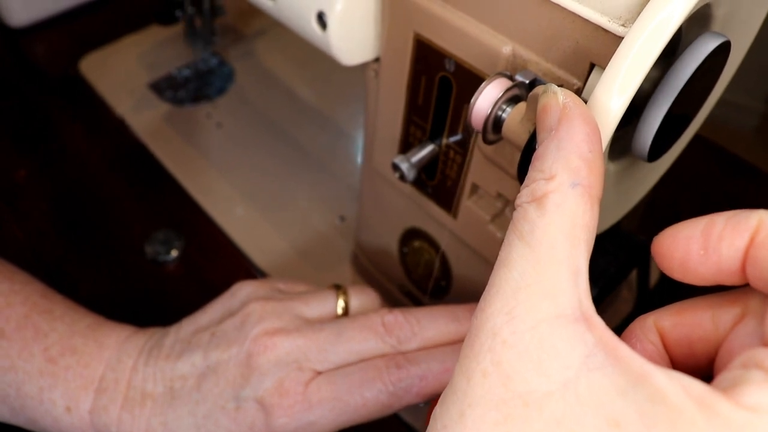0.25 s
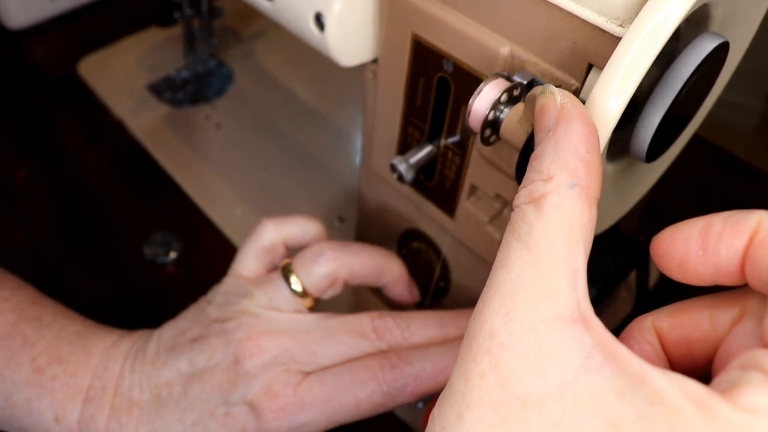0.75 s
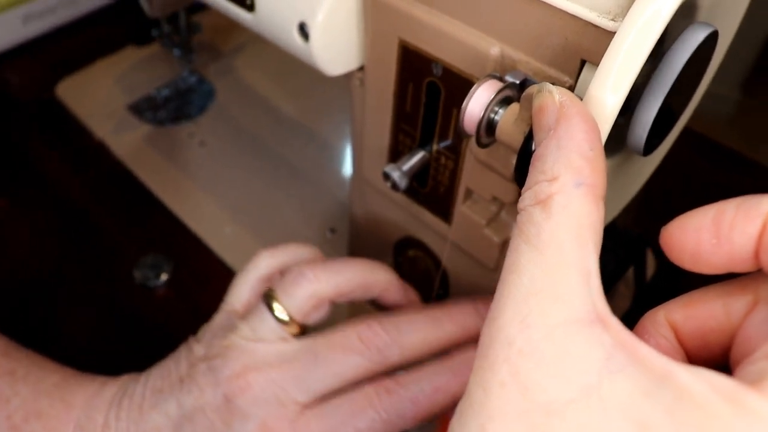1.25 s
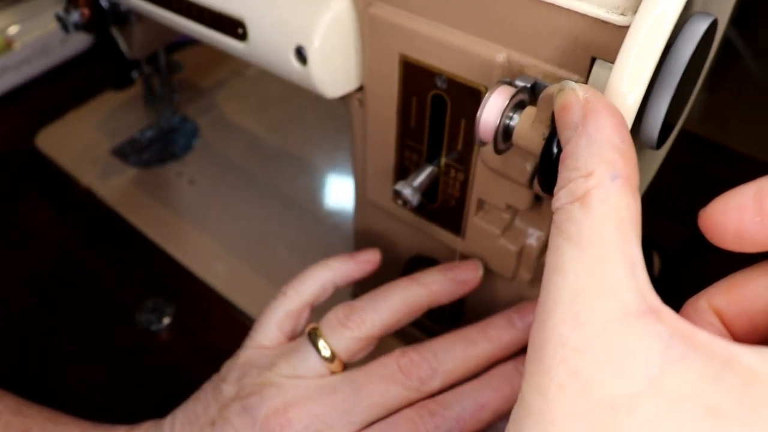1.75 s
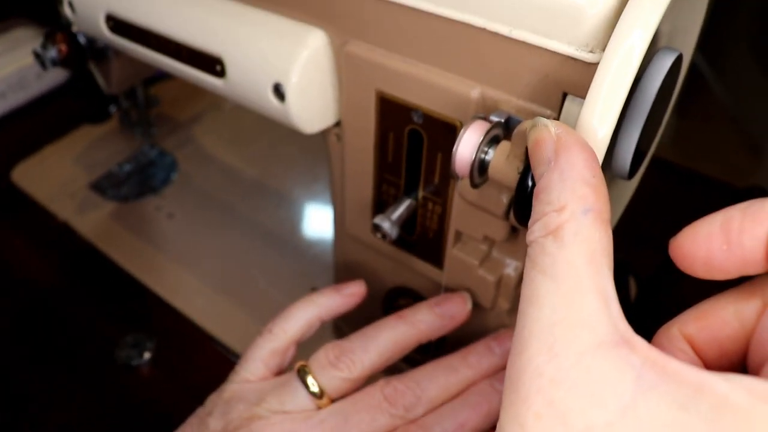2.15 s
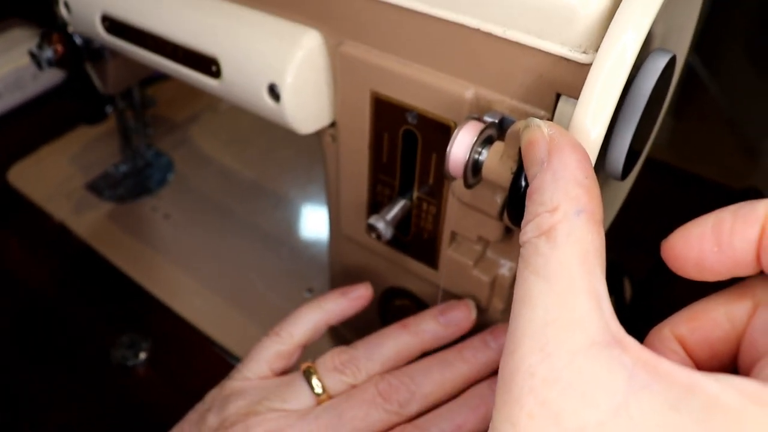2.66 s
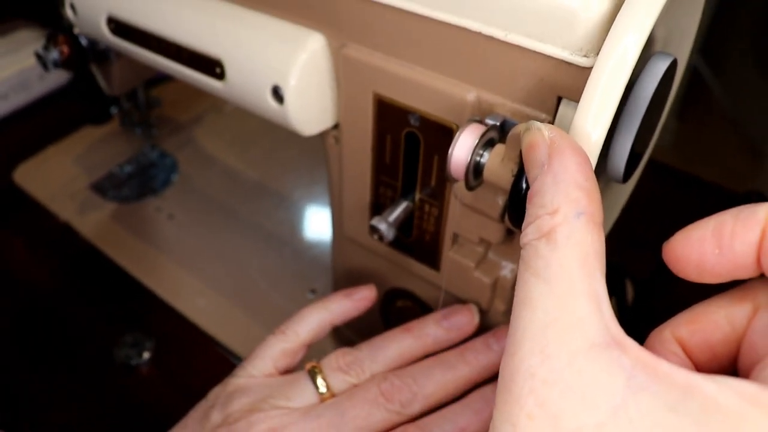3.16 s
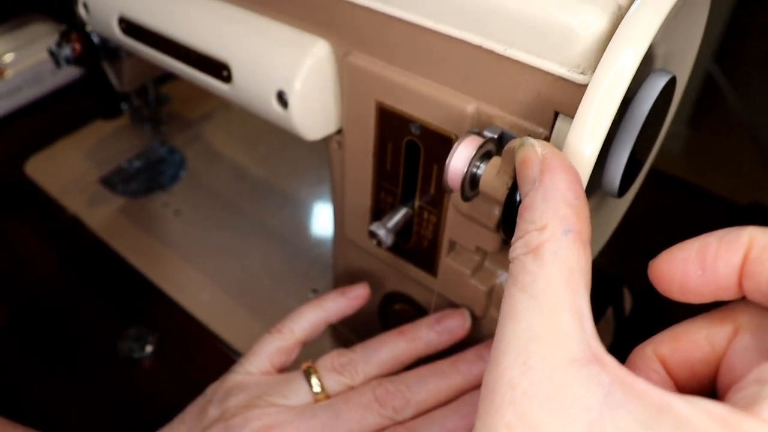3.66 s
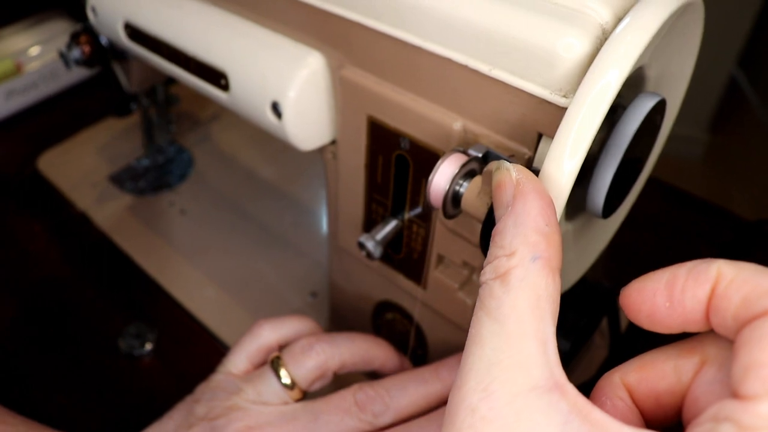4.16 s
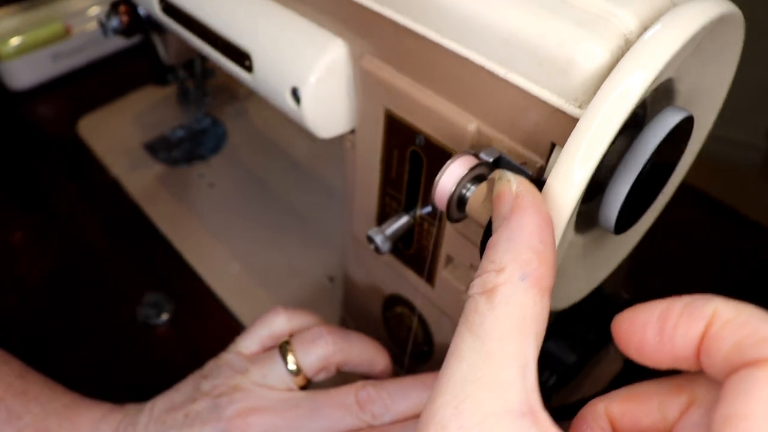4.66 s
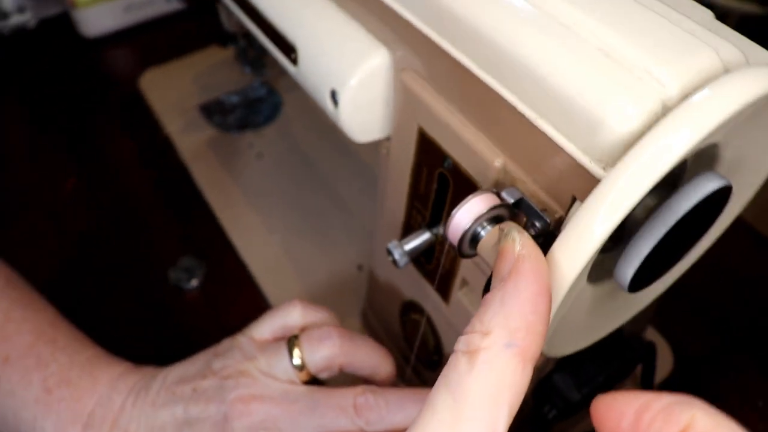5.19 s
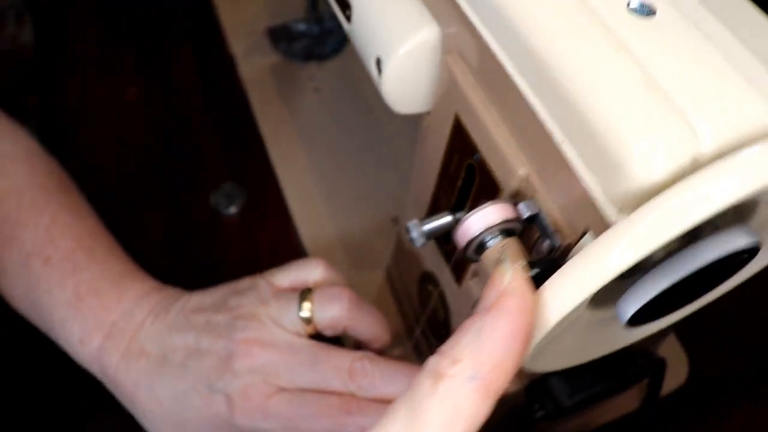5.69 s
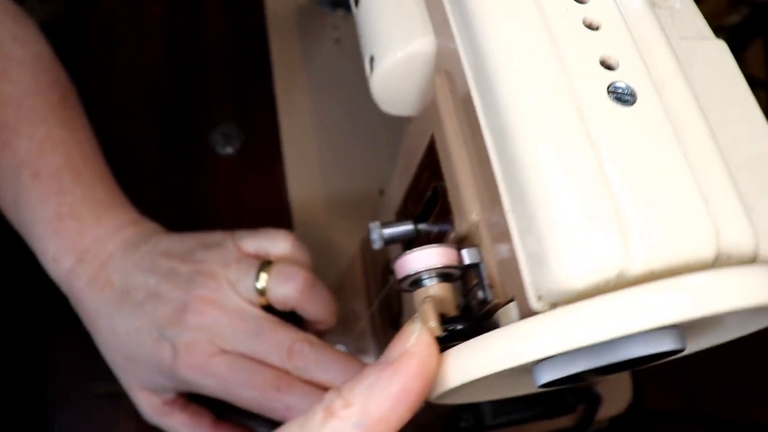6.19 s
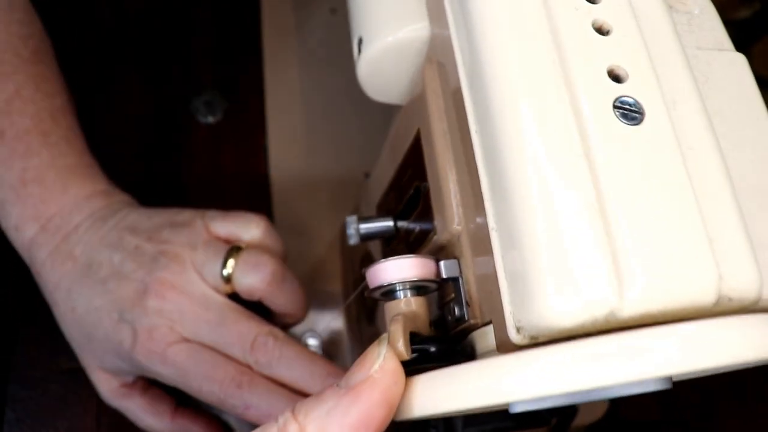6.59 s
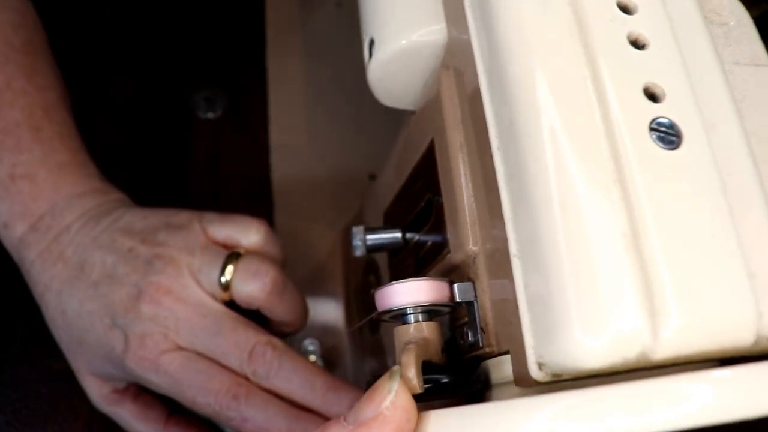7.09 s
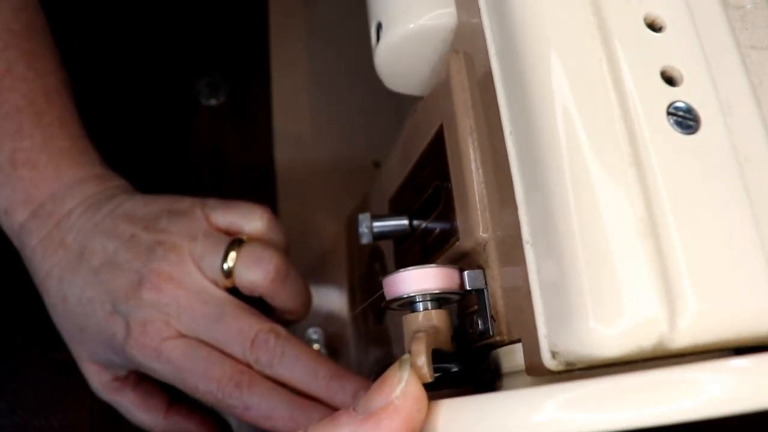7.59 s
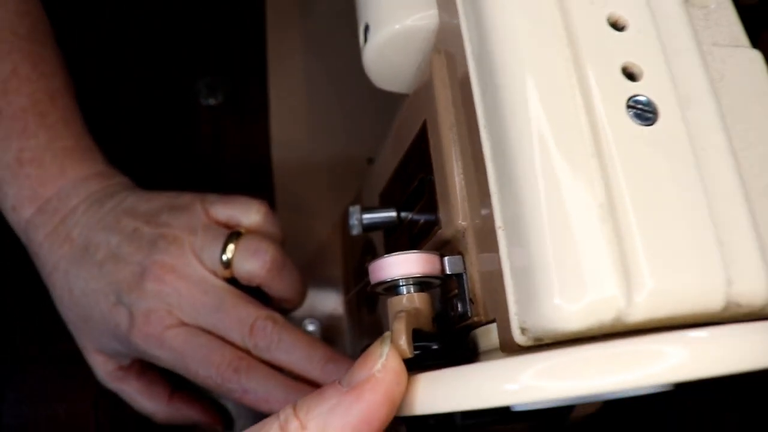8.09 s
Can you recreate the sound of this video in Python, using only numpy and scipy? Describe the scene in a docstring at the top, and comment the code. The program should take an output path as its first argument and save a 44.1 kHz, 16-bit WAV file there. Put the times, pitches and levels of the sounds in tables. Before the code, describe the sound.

A sewing machine motor runs at nearly constant speed throughout, winding a bobbin. A low hum sits under a nasal whine and a bright, dense hiss of brushes and belt. After the first second, tiny crisp metallic ticks come in irregular clusters, then thin out. Close hand-held stereo microphone, dry indoors; the tone colour shifts as it swings from front to above.

```python
"""Sewing machine motor winding a bobbin

A motor runs steadily, heard by a hand-held stereo camera that swings from the front to above.
Sines on multiples of the motor turn, with side tones, sound in the hiss of brushes and belt.
The hiss is shaped noise coloured by the machine's shell; narrow noise bands are humming plates.
The bobbin ticks in bursts of short damped rings, and a limiter ducks the sound after strong peaks."""
import sys
import numpy as np
from scipy import signal
from scipy.io import wavfile
from scipy.ndimage import uniform_filter1d

SR = 44100
rng = np.random.default_rng(int(sys.argv[2]) if len(sys.argv) > 2 else 0)


def digitize_waveform(pressure):
    """Quantize a signal to 16-bit integers and store it at the path in sys.argv[1].

    Rows of a 2-D input are taken as channels; values are limited to [-1, 1].
    """
    field = np.atleast_2d(pressure).T
    bounded = np.clip(field, -1, 1)
    quanta = np.round(bounded * 32767).astype(np.int16)
    wavfile.write(sys.argv[1], SR, quanta)


N = 367794

# Motor speed: time_s, turns_per_s
MOTOR_SPEED = [(0, 129.0), (0.35, 129.05), (0.56, 128.6), (0.63, 128.05), (0.78, 128.2), (1.0, 128.0),
               (1.07, 127.1), (1.45, 127.55), (1.8, 128.25), (2.2, 128.0), (2.57, 127.7), (2.9, 128.9),
               (3.15, 128.95), (3.45, 128.45), (3.9, 128.15), (4.3, 127.6), (4.47, 127.95), (4.73, 127.6),
               (5.0, 127.95), (5.6, 128.05), (6.0, 128.35), (6.2, 128.5), (6.75, 127.95), (7.85, 128.4),
               (8.12, 128.0), (8.34, 128.2)]
# Slow drift of the gain on all but the ticks: time_s, gain_db
MOTOR_DRIFT = [(0, 2), (0.8, 2), (1.1, 1.5), (1.7, 3.5), (2.1, 2.5), (2.6, 3), (3.2, 1.5), (3.9, 1.5),
               (4.25, 3), (4.6, 2), (5.3, 2), (6.0, 1.3), (7.0, 2.5), (8.34, 2.2)]
# Direction of view: time_s, view (0 front, 1 swinging, 2 above)
CAMERA_VIEW = [(0, 0.043), (4.3, 0.041), (5.0, 0.23), (5.5, 0.85), (5.9, 0.88), (6.4, 1.36), (6.7, 1.55),
               (7.0, 2.6), (8.34, 2.04)]
# Rotor and commutator tones, before drift: multiple_of_turn,
# then for each of the three views: left_db, right_db, left_lead_rad
MOTOR_TONES = [(1.0, -64.0, -64.5, -0.1, -62.0, -62.0, 0.0, -62.0, -62.5, -0.1),
               (2.0, -45.0, -45.0, 0.0, -43.0, -43.0, 0.0, -43.5, -43.5, 0.0),
               (3.0, -54.5, -55.5, -0.3, -54.0, -54.0, -0.1, -54.0, -54.0, 0.0),
               (4.0, -58.0, -58.5, -0.2, -62.5, -63.5, -0.8, -62.5, -65.5, -1.3),
               (10.0, -45.0, -45.5, -0.1, -43.5, -46.0, -1.0, -44.5, -43.5, -0.6),
               (11.0, -50.0, -53.5, 2.6, -47.5, -47.5, 5.8, -45.0, -43.5, 5.9),
               (12.0, -60.5, -56.0, 0.7, -56.5, -54.5, -0.3, -54.5, -55.5, -0.3),
               (19.0, -65.5, -55.5, -2.1, -60.0, -52.5, -2.1, -66.5, -54.5, -2.1),
               (20.0, -66.0, -56.0, -2.6, -60.5, -55.0, 0.4, -63.5, -56.0, -1.0),
               (21.0, -55.5, -60.0, 0.3, -60.5, -59.5, 0.9, -56.5, -50.0, 0.8),
               (22.0, -54.0, -45.5, -0.0, -53.0, -50.0, -0.4, -51.0, -52.5, -0.7),
               (23.0, -52.5, -49.0, 1.2, -52.0, -52.5, -0.3, -55.5, -52.0, -0.1),
               (24.0, -58.0, -55.0, 2.2, -57.0, -65.5, 2.2, -66.5, -65.0, 3.8),
               (31.0, -60.0, -58.5, 0.4, -57.0, -58.5, -2.3, -58.0, -53.5, -1.9),
               (32.0, -49.0, -50.0, 0.2, -55.5, -56.5, -1.3, -56.0, -65.0, -2.8),
               (33.0, -46.5, -47.0, -0.5, -55.5, -53.5, -1.2, -57.5, -47.0, 0.8),
               (34.0, -46.5, -48.5, 0.5, -45.0, -51.0, 0.0, -44.5, -52.0, -0.9),
               (35.0, -64.0, -63.0, -2.1, -58.5, -52.5, -0.6, -61.0, -52.5, -1.1),
               (36.0, -57.0, -54.0, 1.9, -52.5, -59.5, 0.5, -51.0, -62.0, -1.6),
               (43.0, -53.0, -53.5, 1.5, -49.0, -47.0, 0.2, -51.0, -52.5, 0.9),
               (44.0, -48.5, -49.0, 2.7, -44.0, -42.0, 5.2, -46.0, -47.0, 5.6),
               (45.0, -53.5, -57.0, 3.0, -63.0, -49.5, 1.5, -51.0, -61.0, -0.2),
               (48.0, -51.0, -53.5, -0.2, -47.0, -49.0, -1.1, -47.5, -62.5, -2.0),
               (50.0, -59.0, -60.0, -1.6, -56.5, -60.5, -3.9, -53.0, -53.5, -3.7),
               (53.0, -59.0, -57.0, -2.3, -55.5, -58.5, 0.3, -58.0, -59.5, 1.5),
               (54.0, -53.0, -49.5, 1.4, -50.0, -55.0, -1.4, -61.0, -53.5, -4.0),
               (55.0, -46.5, -50.0, -2.0, -47.0, -49.5, -0.2, -44.5, -55.5, 1.0),
               (56.0, -56.0, -57.0, 2.5, -55.5, -50.5, 4.7, -53.5, -49.0, 2.0),
               (57.0, -54.0, -62.5, 0.7, -61.5, -53.5, 3.5, -55.0, -53.5, 1.4),
               (65.0, -49.0, -51.0, -1.4, -52.5, -51.0, -3.4, -55.0, -49.0, -1.4),
               (66.0, -51.5, -53.0, -1.6, -54.5, -58.5, -2.5, -58.0, -64.5, -0.7),
               (67.0, -56.5, -56.5, 0.1, -53.5, -55.5, 2.9, -54.0, -53.5, 3.3),
               (76.0, -56.5, -54.0, -0.3, -54.0, -51.0, -2.6, -64.5, -55.5, -2.7),
               (77.0, -60.0, -53.0, 1.7, -57.5, -55.5, 0.3, -62.5, -58.0, 2.8),
               (87.0, -58.0, -65.5, -1.9, -63.0, -56.5, 1.2, -53.5, -55.0, 2.8),
               (88.0, -64.0, -60.5, -1.7, -61.5, -59.0, -3.9, -53.0, -54.5, -2.0)]
# Side tones: multiple_of_turn, beat_steps (turn less mains ripple), tyre_steps (winder tyre's turn),
# front_db, above_db (both relative to the tone)
SIDE_TONES = [(1, -1, 0, -16, -16), (2, -2, 0, -25, -25), (2, -1, 0, -13, -12), (2, 1, 0, -16, -15),
              (2, 0, 1, -21, -23), (3, -1, 0, -13, -14), (3, 1, 0, -14, -14), (3, 0, 1, -12, -13),
              (4, -1, 0, -7, -8), (10, -1, 0, -20, -18), (10, 1, 0, -22, -19), (10, 0, -1, -8, -10),
              (10, 0, 1, -22, -11), (10, 0, 2, -10, -14), (10, 0, 3, -16, -21), (11, -1, 0, -15, -14),
              (11, 1, 0, -15, -14), (11, 0, -1, -7, -19), (11, 0, 1, -5, -16), (11, 0, 2, -11, -24),
              (21, 0, 2, -3, -8)]
# Slow gain of two groups of tones, near 1.3 and 4.2 kHz: time_s, whine_db, whir_db
WHINE_AND_WHIR = [(0, -3, -1), (0.3, 2, -1), (0.5, 0.5, 0), (0.65, 1, 2.5), (0.85, 0, 0.5), (1.08, 3.5, 2),
                  (1.25, 1, 0), (1.7, 0, 1), (2.15, 0, -2), (2.3, 2.5, -1.5), (2.6, 1, 0),
                  (2.9, -0.5, -0.5), (3.3, -1, -1.5), (3.55, 1.5, -1), (3.75, -0.5, -5), (4.0, 1, 2.5),
                  (4.2, 2, 1), (4.5, 0.5, -1.1), (4.7, 1.5, -3), (5.0, 0.5, 0), (5.4, 0.5, 0),
                  (5.7, -1.5, -2), (6.1, 1, 0.5), (6.6, 1.7, -1), (7.3, 0.7, -0.5), (7.8, 1.1, 1.5),
                  (8.34, .1, -2)]
# Passing of the ring near 5.6 kHz between two multiples as the camera swings:
# time_s, multiple_43_db, multiple_44_db
RING_HANDOVER = [(4.6, 0, 1), (5.3, 3.5, -3), (5.8, -1, -1), (6.2, 0, 3), (6.8, 0, 4), (7.2, 1, 1.5),
                 (8.34, 1, 2)]
# Brush and belt noise density before colouring: frequency_hz, level_db_per_hz
HISS_SPECTRUM = [(40, -103), (80, -93.5), (190, -81), (280, -73), (350, -76.5), (480, -78.5), (620, -78),
                 (850, -80), (1100, -74.5), (1600, -72), (3800, -69.5), (7800, -67.5), (10300, -69),
                 (12300, -73.5), (14500, -77.5), (15800, -81.5)]
# Shell resonances: frequency_hz, width_hz, then for each view: left_db, right_db
SHELL_RESONANCES = [(1180, 120, -0.5, -0.5, 5, 1, 3, -1), (1520, 55, 3, 0, 6, -8, 2, -1),
                    (2160, 120, -7, 2, -1, -4, -2, 2), (1322, 185, 4.5, 6.5, 0, 4, 5, 7),
                    (1800, 300, -1.5, 0.5, -4, 1.5, -1.5, 0.5), (2280, 230, 4, 5.5, -1, 3.5, -1, 1.5),
                    (2645, 260, 0, 6.5, -1.5, 8, 1.5, 8.5), (3320, 600, 4.5, 3.5, 3.5, 1.5, 2, 2),
                    (4000, 82, 0, -11, -3, 5, 1, 1), (4650, 190, -4, -4, -3, 3.5, -4, 4),
                    (4000, 200, -1, 2.5, -1, 1, 2, -5), (4380, 340, 4.5, 3, 2, 5, 4, 2.5),
                    (4777, 193, 0, 9, 3.5, 1, 6, 6.5), (5020, 230, 2.5, 3.5, 5, 2, 5, 1),
                    (5550, 230, 2, 1.5, 2, 8.5, 2, 0), (6146, 426, 9.5, 5.5, 10, 7.5, 8.5, 2),
                    (6530, 150, 2, 6, 6.5, -8, 0, 5), (7240, 490, 2, 4.5, -2, 9, 5, 7),
                    (7735, 390, 3.5, 6, 3, 2, 4, -1.5), (7900, 200, 8.5, 0.5, 8.5, -8, 7, 1),
                    (8400, 200, 1, -3, -6, 6, -2, 2), (8800, 250, -3, -2.5, -8, 4, -10, 5),
                    (9060, 490, 1, 9, 3.5, 3.5, 4.5, 2), (9940, 400, 1.5, 0.5, 0, 3, 2, 4.5),
                    (10920, 360, -3, 3.5, 1, 1.5, -3, 4.5), (11360, 250, 3, 0.5, 0, 3, 9, 5.5),
                    (12020, 400, -1, 2, 4, 0.5, 3.5, 5), (12200, 300, 1.5, 0, 0, 5, -1, 1),
                    (12700, 250, 0, -6, -1, 0, 0, -2), (13450, 400, -8, -1, -1, -2, 4, 0),
                    (13800, 200, -4, -4, -2, 1, -7, -6), (14500, 550, 1, -11, -1, 3, -6, 1)]
# Left-right likeness of the hiss: frequency_hz, then for each view: share (0-1), left_lead_rad
STEREO_LIKENESS = [(60, 0.9, 0, 0.9, 0, 0.9, 0), (130, 0.95, 0, 0.95, 0, 0.95, 0), (180, 1, 0, 1, 0, 1, 0),
                   (270, 1, 0, 1, 0, 1, 0), (350, 0.84, 0, 0.92, 0, 0.97, 0),
                   (640, 0.86, 0, 0.86, 0, 0.84, 0), (1300, 0.6, -0.2, 0.6, -0.2, 0.6, -0.2),
                   (1800.0, 0.23, -0.3, 0.44, -0.0, 0.37, -0.2),
                   (2100.0, 0.34, -0.3, 0.38, -0.7, 0.58, -0.3),
                   (2400.0, 0.3, -0.4, 0.29, -0.9, 0.32, -0.6), (2700.0, 0.28, 0.2, 0.35, 0.5, 0.41, 0.8),
                   (3000.0, 0.45, 1.1, 0.34, 0.2, 0.49, 0.2), (3300.0, 0.46, 0.1, 0.34, -0.2, 0.29, 0.3),
                   (3600.0, 0.51, -0.3, 0.4, -0.2, 0.57, 0.0), (3900.0, 0.31, -0.1, 0.28, -1.2, 0.13, -1.7),
                   (4200.0, 0.61, -0.1, 0.39, -1.0, 0.1, -5.3), (4500.0, 0.1, 0.6, 0.17, -0.4, 0.24, -8.7),
                   (4800.0, 0.15, 1.6, 0.3, 1.8, 0.44, -10.8), (5100.0, 0.12, 1.4, 0.16, -3.5, 0.19, -8.3),
                   (5400.0, 0.05, 0.3, 0.32, -5.2, 0.09, -7.1), (5700.0, 0.22, 2.7, 0.48, -7.1, 0.47, -6.9),
                   (6000.0, 0.52, 0.9, 0.37, -6.8, 0.22, -6.7), (6300.0, 0.3, 2.2, 0.33, -6.0, 0.18, -4.0),
                   (6600.0, 0.28, 2.0, 0.02, -2.7, 0.16, -2.9), (6900.0, 0.06, 4.7, 0.18, -1.0, 0.23, -5.0),
                   (7200.0, 0.11, 5.2, 0.49, -0.7, 0.37, -5.6), (7500.0, 0.42, 6.4, 0.27, -2.7, 0.27, -3.4),
                   (7800.0, 0.63, 5.9, 0.28, -2.2, 0.48, -6.8), (8100.0, 0.45, 6.3, 0.32, 0.7, 0.32, -8.7),
                   (8400.0, 0.31, 4.7, 0.43, 3.4, 0.19, -8.5), (8700.0, 0.22, 5.6, 0.28, 2.7, 0.27, -12.0),
                   (9000.0, 0.34, 7.1, 0.1, 2.6, 0.22, -16.3), (9300.0, 0.4, 5.5, 0.21, 3.4, 0.38, -16.9),
                   (9800.0, 0.22, 6.8, 0.35, 3.2, 0.16, -17.0),
                   (10300.0, 0.06, 10.7, 0.33, 3.9, 0.48, -15.6),
                   (10800.0, 0.41, 11.7, 0.09, 0.9, 0.23, -14.9),
                   (11300.0, 0.25, 11.5, 0.3, -3.0, 0.57, -15.1),
                   (11800.0, 0.14, 9.5, 0.15, 0.1, 0.16, -10.8),
                   (12300.0, 0.13, 9.9, 0.16, -2.8, 0.37, -12.0),
                   (13300.0, 0.31, 6.6, 0.17, 8.8, 0.4, -12.2),
                   (14300.0, 0.51, 6.1, 0.23, 9.3, 0.32, -13.1),
                   (15800.0, 0.47, 6.1, 0.23, 12.4, 0.62, -18.9)]
# Brief surges in the middle of the hiss: time_s, rise_db
HISS_SURGES = [(0.27, 5), (0.365, 8), (1.115, 7), (1.76, 4), (2.6, 4.5), (3.13, 2), (3.55, 6), (5.17, 7),
               (6.05, 9)]
# Random patchiness of the hiss: frequency_hz, depth_db (rms)
HISS_PATCHINESS = [(300, 0.6), (1000, 2.14), (1900, 1), (4000, -0.1), (12000, 1.38)]
# Quick random rattle of the hiss: frequency_hz, depth_db (rms)
HISS_RATTLE = [(600, 0.55), (1300, 0.5), (1700, 3.5), (2100, 2.5), (2600, 1.5), (6000, 0.6), (12000, 0.73)]
# Humming plates of the bed, before drift: frequency_hz, width_hz, level_db
BED_PLATES = [(305.6, 11.3, -59), (422.6, 24, -60.5), (571, 4.2, -59.5), (623.5, 20, -61.5),
              (1657, 21, -66), (2178, 21, -57.5), (2294, 7.8, -54)]
# Bobbin ticks: start_s, ring_peak_db, left_less_right_db, left_lead_ring_turns
BOBBIN_TICKS = [(1.1416, -19, -4, .1), (1.1796, -18, 2, .2), (1.2268, -13, 6, .3), (1.2376, -21, 6, -.1),
                (1.293, -17, -4, -.1), (1.3032, -15, 1, .3), (1.3431, -14, -4, .2),
                (1.4216, -13.5, -2, -.3), (1.564, -12, 0, -.2), (1.8037, -10, 4, -.2),
                (1.8251, -20, -2, -.2), (1.8329, -13, -2, -.1), (1.8637, -14, 2, -.3),
                (1.9365, -19, 2, -.1), (1.9595, -10, -4, .3), (2.0067, -12, -2, 0), (2.032, -20, 2, -.3),
                (2.0634, -19, 4, -.5), (2.1012, -15, 0, -.4), (2.197, -21, 10, -.5), (3.0473, -17, 2, .1),
                (3.0716, -20, 5, 0), (3.1028, -17, 5, .2), (3.1412, -19, 4, .1), (3.1629, -17, 0, .2),
                (3.1988, -18, 0, .4), (3.2111, -15, -4, 0), (3.2446, -21, 0, .2), (3.3216, -19, 4, .2),
                (3.6445, -16, 7, -.3), (3.6645, -17, 3, 0), (3.7193, -20, -2, -.2), (3.7776, -18, 7, -.2),
                (3.8139, -18, -8, 0), (3.8704, -20, -2, -.3), (4.4037, -17, 8, -.4), (4.4379, -17, 0, -.2),
                (4.4788, -14, 1, -.3), (4.51, -18, -4, .5), (5.4537, -17, 0, -.3), (5.6764, -22, -8, -.4),
                (5.8315, -21, -8, -.2), (6.0402, -19, -8, -.3), (7.0048, -16, 0, .1), (7.8928, -13, -4, .1),
                (7.9337, -11, -4, .1), (7.9681, -14, -4, 0), (8.1973, -20, -6, .2)]

STEP = 6  # samples between values of slow envelopes
FRAME, HOP = 1024, 256  # samples in a noise frame and between frames
RIPPLE_HZ, TYRE_RATIO = 120, 5.09  # mains ripple; motor turns for each turn of the winder tyre
SWELL_PER_S, SWELL_CREST_S = 2.51, 0.26  # rate and one crest of the regular swell
SWELL_HISS_DB, SWELL_LOW_DB, SWELL_HIGH_DB = 0.23, 0.65, 0.66  # rise at the crest
SURGE_S, SURGE_HZ, SURGE_WIDTH_HZ = 0.019, 1870, 1100  # Gaussian half-length, centre, half-width
LULL_DB, LULL_END_S = -1.5, 1.02  # the middle of the hiss starts quieter
RING_FRONT_HZ, RING_ABOVE_HZ, RING_SCATTER_HZ = 10750, 9600, 700  # scatter is the full span
RING_FRONT_S, RING_ABOVE_S = .00024, .00028  # decay time constants
EDGE_HZ = 15770  # upper band limit


def gain_of(db):
    """Level law: twenty decibels are a factor of ten in amplitude."""
    return 10 ** (np.asarray(db) / 20)


def evened(x):
    """Normalisation: scales a signal to unit rms."""
    return x / np.sqrt(np.mean(abs(x) ** 2) + 1e-20)


def read(points, hz):
    """Logarithmic pitch scale: interpolates a table's values evenly in log frequency."""
    f, value = np.transpose(points)
    return np.interp(np.log(hz + 1), np.log(f + 1), value)


def view_shares(t):
    """Linear crossfade: the shares of the three views at times t add to one."""
    view = np.interp(t, *np.transpose(CAMERA_VIEW))
    share = np.maximum(1 - abs(view - np.arange(3)[:, None]), 0)
    return share / share.sum(0)


def slow(rate_hz):
    """Low-passed noise: slow chance of rms 1, one value every STEP samples."""
    chance = rng.standard_normal(N // STEP + 1)
    b, a = signal.butter(2, rate_hz, fs=SR / STEP)
    return evened(signal.lfilter(b, a, chance))


def carry(envelope, turns):
    """Complex modulation: a slow envelope sets the size and phase of a carrier's turns."""
    held = np.repeat(envelope, STEP, -1)[..., :N]
    return (held * np.exp(2j * np.pi * turns)).real


def swell(t, depth_db):
    """Amplitude modulation: the level in decibels follows a slow cosine."""
    return gain_of(depth_db * np.cos(2 * np.pi * SWELL_PER_S * (t - SWELL_CREST_S)))


def plate_hums():
    """Narrow-band noise: slow complex chance carried at each plate's pitch."""
    t = np.arange(N) / SR
    hums = np.zeros(N)
    for hz, width_hz, db in BED_PLATES:
        envelope = slow(width_hz) + 1j * slow(width_hz)
        hums += gain_of(db) * carry(envelope, hz * t)
    return hums


def shell_colour_db(hz, share):
    """Resonance and reflection: bell-shaped peaks and a fine ripple for each port and view."""
    shell = np.array(SHELL_RESONANCES)
    bumps = np.exp(-2 * ((hz[:, None] - shell[:, 0]) / shell[:, 1]) ** 2)
    left_db = bumps @ shell[:, 2::2] @ share
    right_db = bumps @ shell[:, 3::2] @ share
    # table and walls reflect: the ripple fades in the bass
    ripple = rng.standard_normal((2, len(hz), 3)) * np.minimum(hz / 2500, 1)[:, None]
    return np.array([left_db, right_db]) + 2.17 * ripple @ share


def stereo_pair(hz, share):
    """Partial coherence: the right port mixes delayed left noise with noise of its own."""
    shape = (len(hz), share.shape[1])
    left = rng.standard_normal(shape) + 1j * rng.standard_normal(shape)
    own = rng.standard_normal(shape) + 1j * rng.standard_normal(shape)
    ports = np.transpose(STEREO_LIKENESS)
    like = [np.interp(hz, ports[0], part) * np.exp(-1j * np.interp(hz, ports[0], lead))
            for part, lead in zip(ports[1::2], ports[2::2])]
    like = np.transpose(like) @ share
    right = like * left + np.sqrt(abs(1 - abs(like) ** 2)) * own
    return np.array([left, right])


def brush_hiss(turns):
    """Short-time noise synthesis: random spectra through the shell throb with the motor turn."""
    frames, hz = N // HOP + 5, np.fft.rfftfreq(FRAME, 1 / SR)
    t = np.arange(frames) * HOP / SR
    share = view_shares(t)

    # smoothing is over frequency bins (axis 0) and frames (axis 1)
    rattle, patches = rng.standard_normal((2, len(hz), frames))
    rattle = evened(uniform_filter1d(uniform_filter1d(rattle, 24, axis=0), 3, axis=1))
    patches = evened(uniform_filter1d(uniform_filter1d(patches, 8, axis=0), 10, axis=1))
    flicker = evened(uniform_filter1d(rng.standard_normal(frames), 5))

    surge_db = LULL_DB * (t < LULL_END_S)
    for start_s, rise_db in HISS_SURGES:
        surge_db = surge_db + rise_db * np.exp(-((t - start_s) / SURGE_S) ** 2)
    middle = np.exp(-((hz - SURGE_HZ) / SURGE_WIDTH_HZ) ** 2)

    level_db = read(HISS_SPECTRUM, hz)[:, None] + shell_colour_db(hz, share)
    level_db = level_db + np.outer(middle, surge_db)
    level_db = level_db + read(HISS_PATCHINESS, hz)[:, None] * patches
    level_db = level_db + read(HISS_RATTLE, hz)[:, None] * rattle + 0.39 * flicker

    spectra = stereo_pair(hz, share) * gain_of(level_db)
    _, noise = signal.istft(spectra, SR, nperseg=FRAME, noverlap=FRAME - HOP, scaling="psd")
    noise = noise[:, :N] / np.sqrt(2)
    throb = 1 + 0.011 * np.cos(2 * np.pi * turns) + 0.021 * np.cos(4 * np.pi * turns)
    return noise * throb


def bobbin_ticks():
    """Damped free vibration: each tick is a bright ring, a duller knock and one bounce."""
    t, out = np.arange(300) / SR, np.zeros((2, N + 400))
    above = view_shares(np.transpose(BOBBIN_TICKS)[0])[1:].sum(0)
    for (start_s, db, pan_db, lead), up in zip(BOBBIN_TICKS, above):
        phase, knock, scatter = rng.random(3)
        hz = RING_FRONT_HZ + (RING_ABOVE_HZ - RING_FRONT_HZ) * up
        hz += RING_SCATTER_HZ * (scatter - .5)
        decay_s = RING_FRONT_S + (RING_ABOVE_S - RING_FRONT_S) * up
        ring_turns = hz * t + phase + np.array([[lead], [0]])
        ring = np.sin(2 * np.pi * ring_turns) * np.exp(-t / decay_s) * t
        ring = ring / abs(ring).max()
        knock_hz = 3500 + 3000 * knock
        tick = ring + gain_of(-10.0) * np.sin(2 * np.pi * knock_hz * t) * np.exp(-t / 0.0003)
        tick = tick + gain_of(-16.0) * np.roll(tick, 14, axis=1)  # bounce, 14 samples later
        at = round(start_s * SR)
        out[:, at:at + 300] += gain_of([[db + pan_db / 2], [db - pan_db / 2]]) * tick
    return out[:, :N]


def tone_drifts():
    """Slow level change: lists drift in decibels at the whine's times, by multiple of the turn."""
    when, whine_db, whir_db = np.transpose(WHINE_AND_WHIR)
    at, lower_db, upper_db = np.transpose(RING_HANDOVER)
    drift_db = {10: whine_db, 32: whir_db, 33: whir_db, 34: whir_db}
    drift_db[43] = np.interp(when, at, lower_db)
    drift_db[44] = np.interp(when, at, upper_db)
    return when, drift_db


def side_tones(order, beat, tyre, above):
    """Modulation sidebands: partials offset from a tone by steps of the beat and tyre turn."""
    sides = np.zeros(len(beat), complex)
    for multiple, beat_steps, tyre_steps, front_db, above_db in SIDE_TONES:
        if multiple != order:
            continue
        # the mains beat mostly bends the pitch of low tones: a quarter turn from the tone
        phase = 1 / 4 if beat_steps and order < 5 else rng.random()
        side_turns = beat_steps * beat + tyre_steps * tyre + phase
        sides += gain_of(front_db + (above_db - front_db) * above) * np.exp(2j * np.pi * side_turns)
    return sides


def motor_tones(turns):
    """Harmonic series: multiples of the turn share its phase wander, so high ones waver more."""
    t = np.arange(N // STEP + 1) * STEP / SR
    share, out = view_shares(t), np.zeros((2, N))
    slow_turns = np.interp(t, np.arange(N) / SR, turns)
    beat, tyre = slow_turns - RIPPLE_HZ * t, slow_turns / TYRE_RATIO
    unsteady = .0015 * slow(15)  # rms in turns of the motor
    when, drift_db = tone_drifts()
    for order, *views in MOTOR_TONES:
        order = round(order)
        left_db, right_db, lead = np.reshape(views, (3, 3)).T @ share
        sides = side_tones(order, beat, tyre, 1 - share[0])

        quick_db = .8 if order < 5 else .6 if order == 10 else 1.5
        slow_db = 1.6 if order > 12 else .4
        flutter_db = quick_db * slow(14) + slow_db * slow(1.5)
        if order in drift_db:
            flutter_db = flutter_db + np.interp(t, when, drift_db[order])

        wave = gain_of(flutter_db) * np.exp(2j * np.pi * (order * unsteady + rng.random()))
        wave = wave * swell(t, SWELL_LOW_DB if order < 5 else SWELL_HIGH_DB)
        leads = np.exp(.5j * np.array([lead, -lead]))
        ports = gain_of([left_db, right_db]) * (leads + sides)
        out += np.sqrt(2) * carry(wave * ports, order * turns)  # levels are rms
    return out


def scene():
    """Superposition: the drifting motor, hiss and plates add to the bobbin's ticks."""
    t = np.arange(N) / SR
    turns = np.cumsum(np.interp(t, *np.transpose(MOTOR_SPEED))) / SR
    hiss = swell(t, SWELL_HISS_DB) * brush_hiss(turns)
    motor = plate_hums() + hiss + motor_tones(turns)
    drift = gain_of(np.interp(t, *np.transpose(MOTOR_DRIFT)))
    return drift * motor + bobbin_ticks()


def record(dry):
    """Dynamic compression: gain drops fast on peaks and recovers slowly; a low-pass limits the band."""
    peak_db = 20 * np.log10(abs(dry).max(0) + 1e-6)
    fall = np.arange(N) * 22.0 / SR  # the held peak falls 22 dB a second
    held_db = np.maximum.accumulate(peak_db + fall) - fall
    over_db = np.maximum(held_db + 17.0, 0)  # threshold -17 dB
    attack = 1 / 12  # smoothing over about 12 samples
    smooth_db = signal.lfilter([attack], [1, attack - 1], over_db)
    ducked = dry / gain_of(0.58 * smooth_db)
    low_pass = signal.firwin(2047, EDGE_HZ, window=("kaiser", 10), fs=SR)
    return signal.oaconvolve(ducked, low_pass[None], "same")


dry = scene()
out = record(dry)
digitize_waveform(out)
```